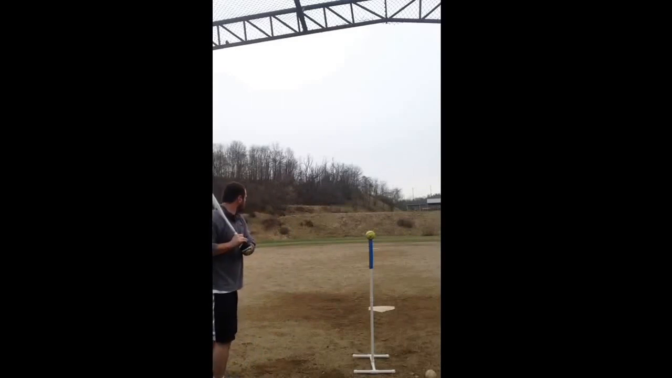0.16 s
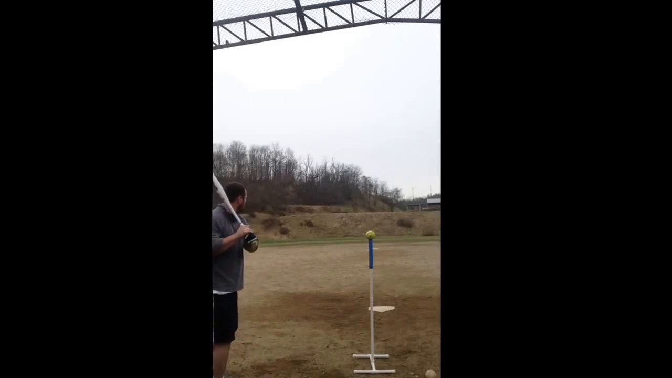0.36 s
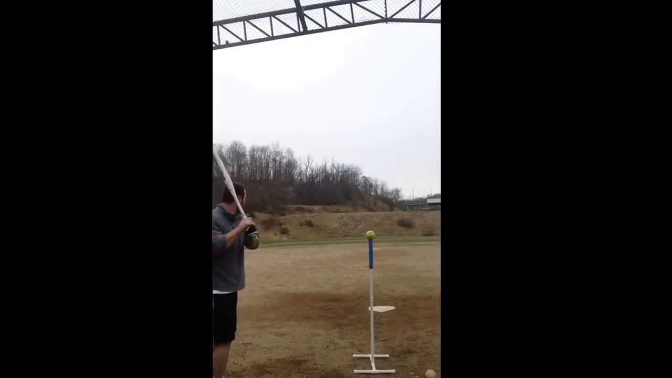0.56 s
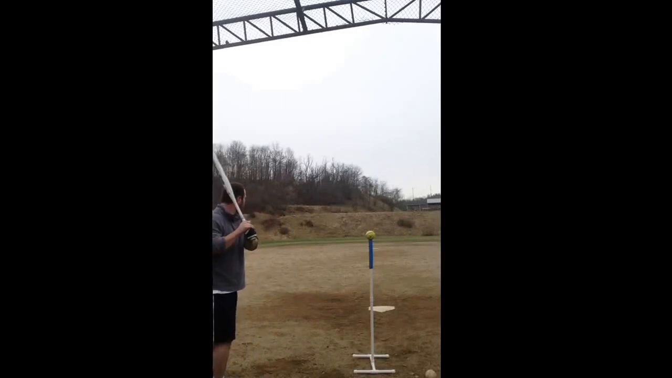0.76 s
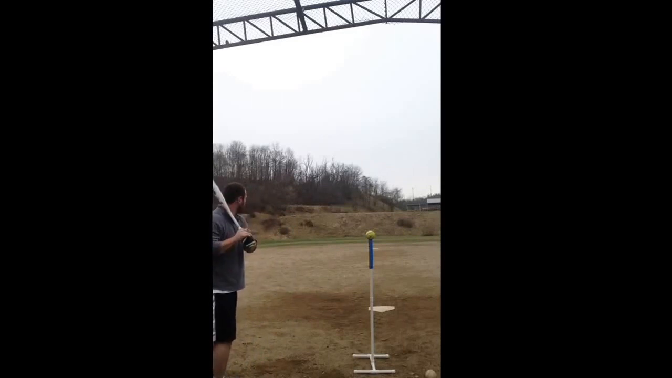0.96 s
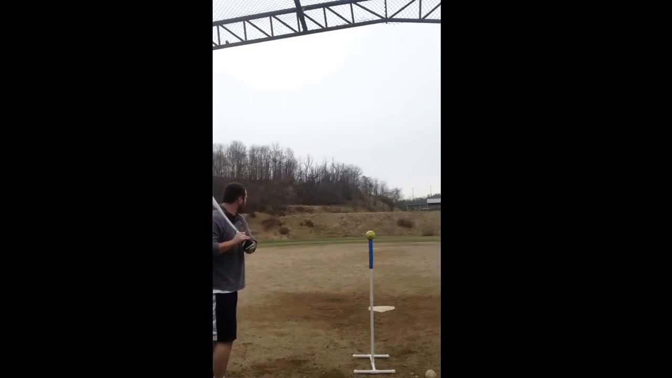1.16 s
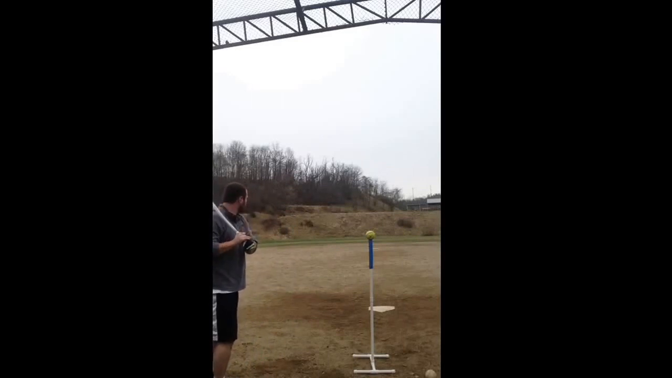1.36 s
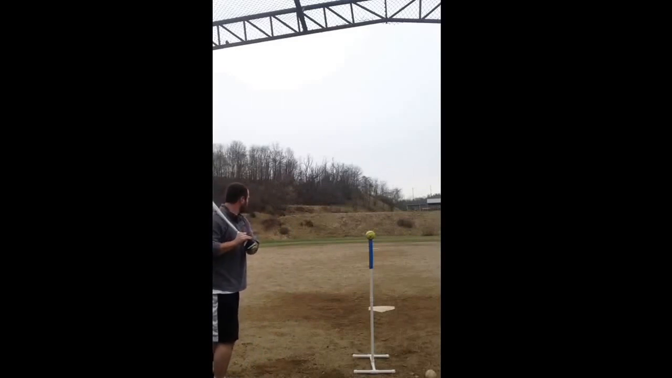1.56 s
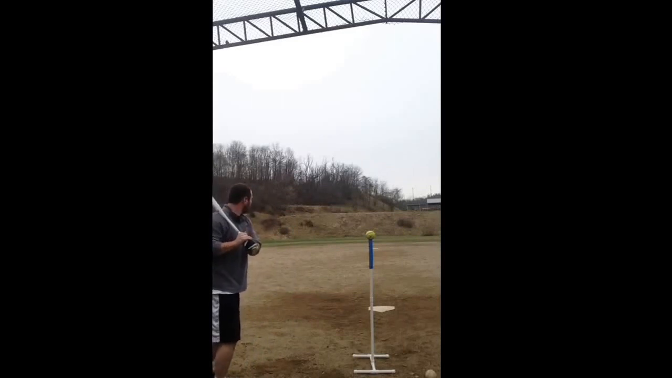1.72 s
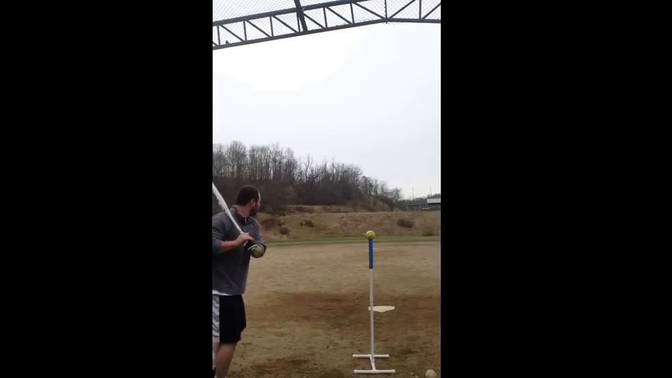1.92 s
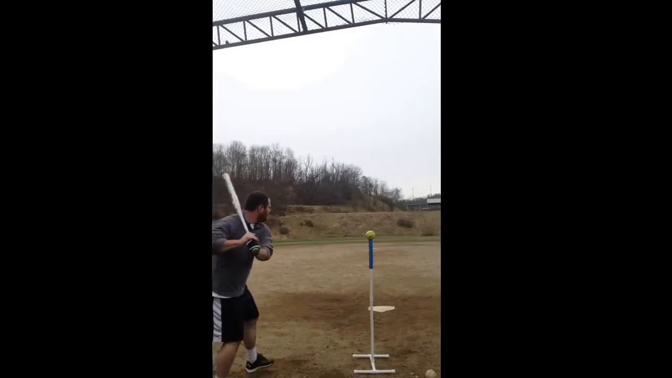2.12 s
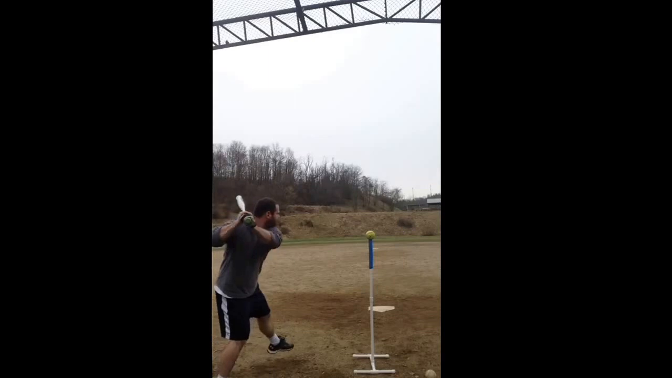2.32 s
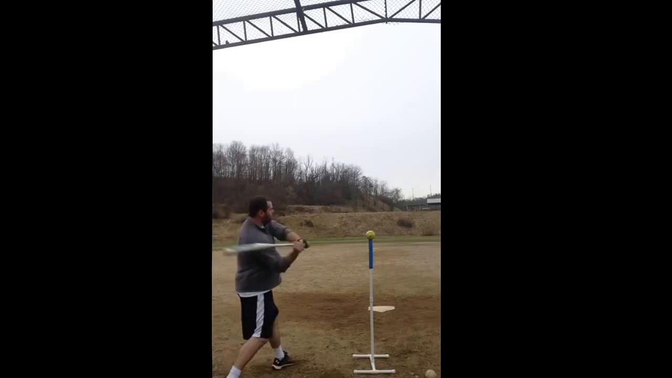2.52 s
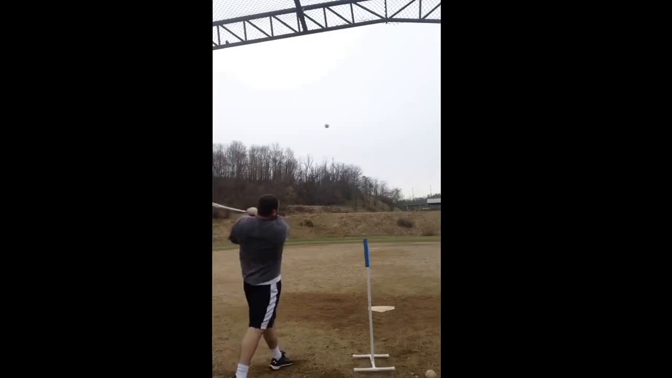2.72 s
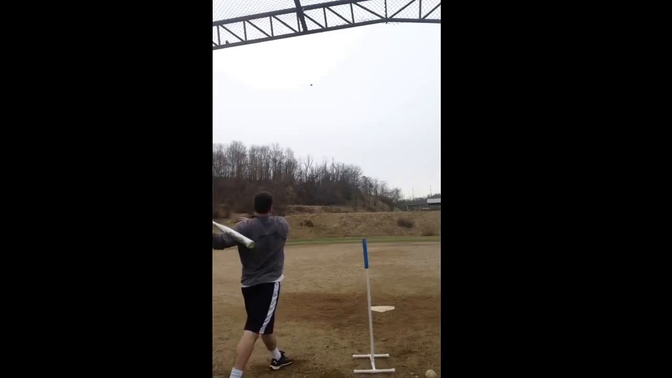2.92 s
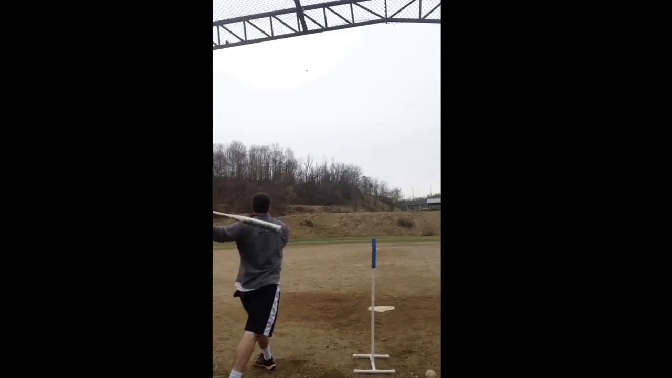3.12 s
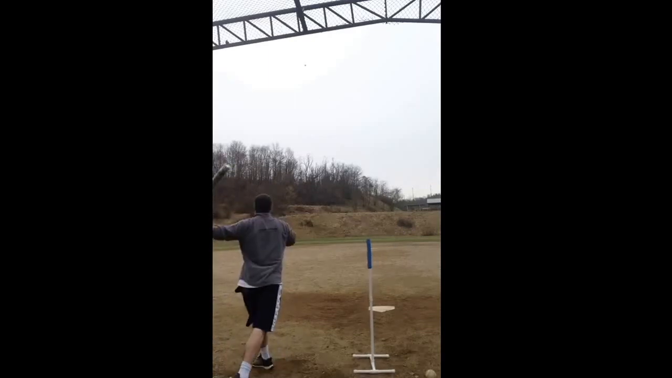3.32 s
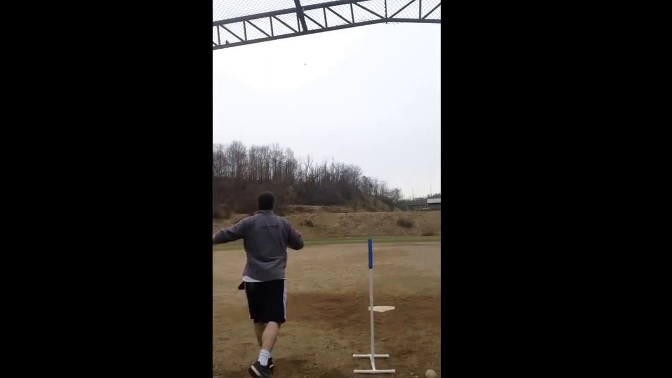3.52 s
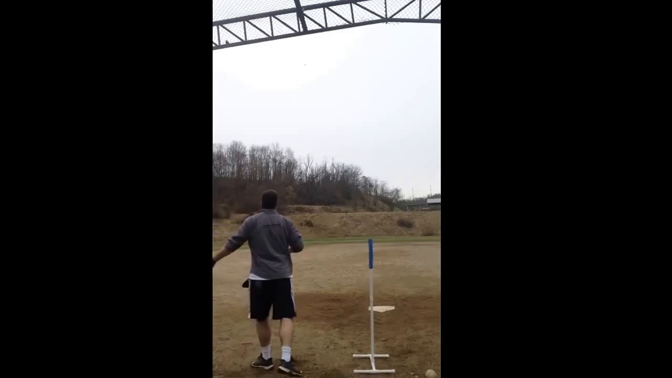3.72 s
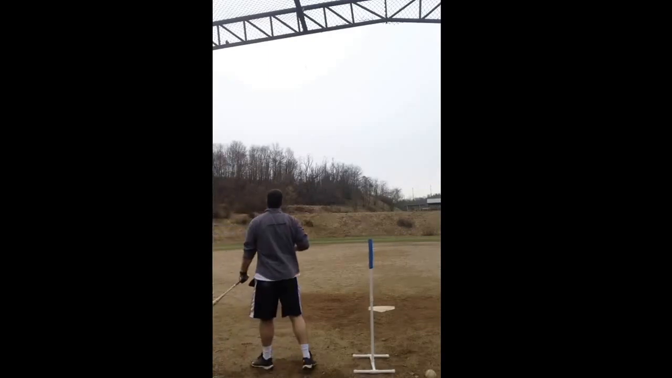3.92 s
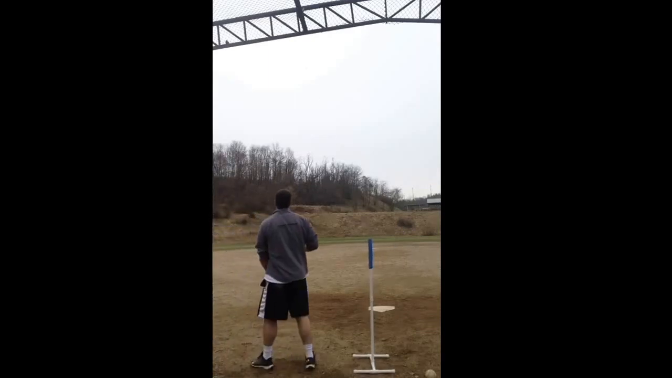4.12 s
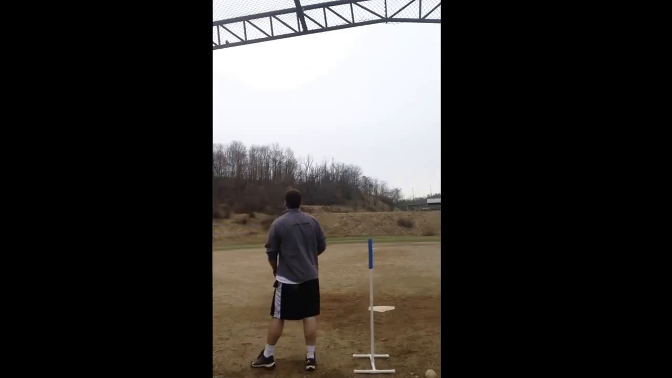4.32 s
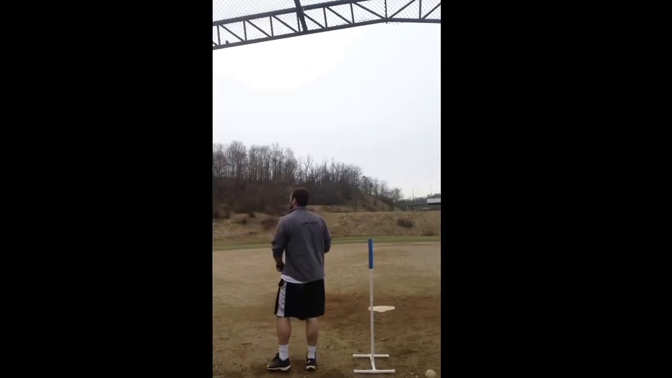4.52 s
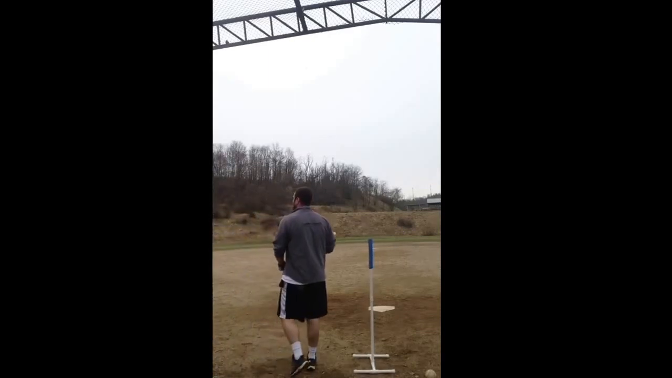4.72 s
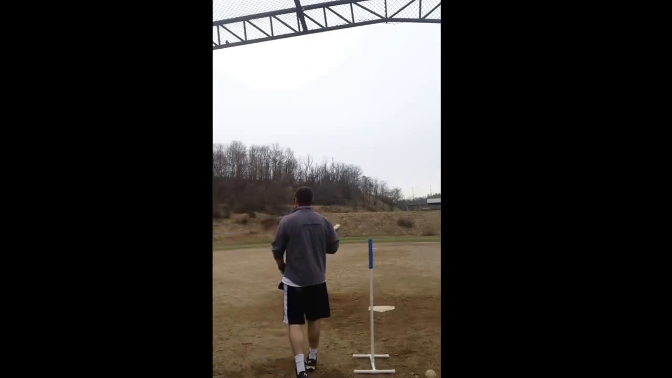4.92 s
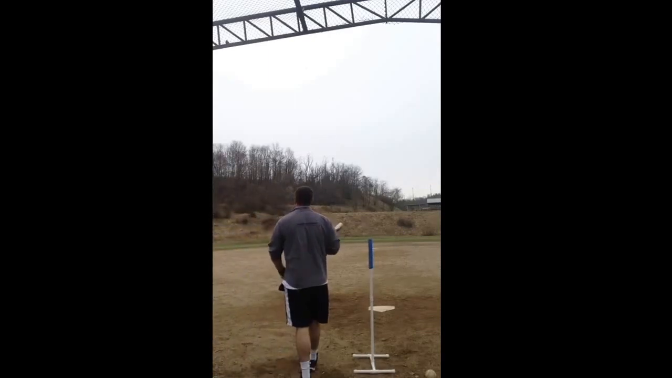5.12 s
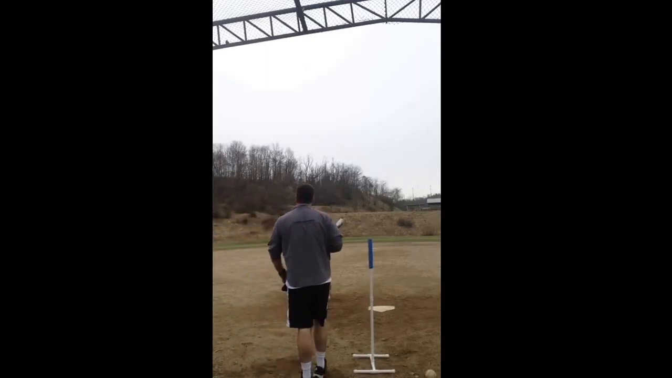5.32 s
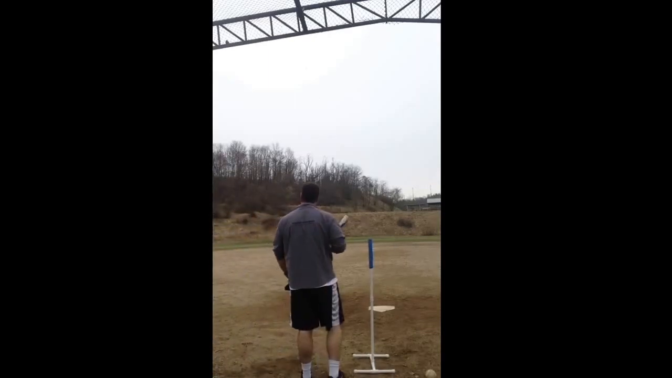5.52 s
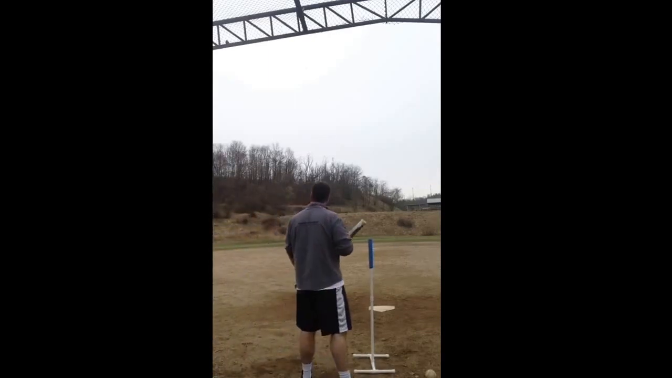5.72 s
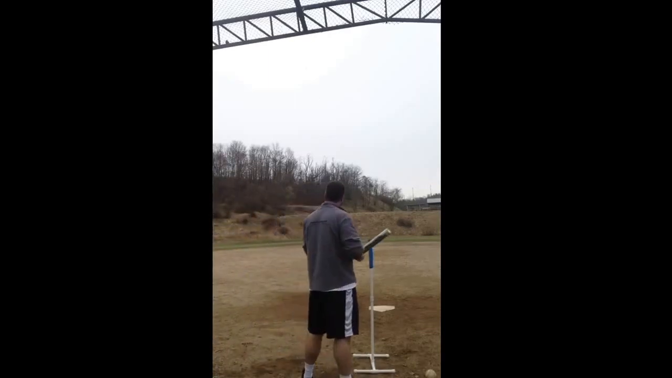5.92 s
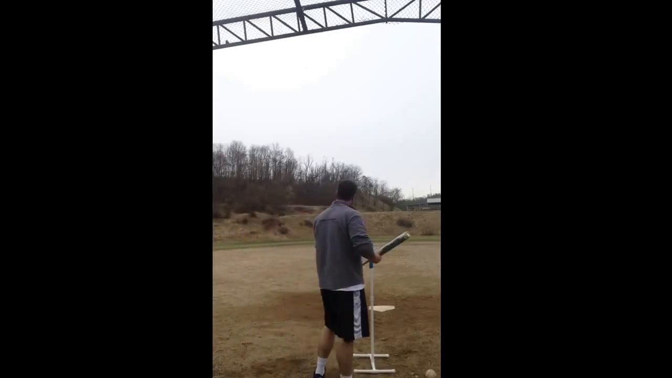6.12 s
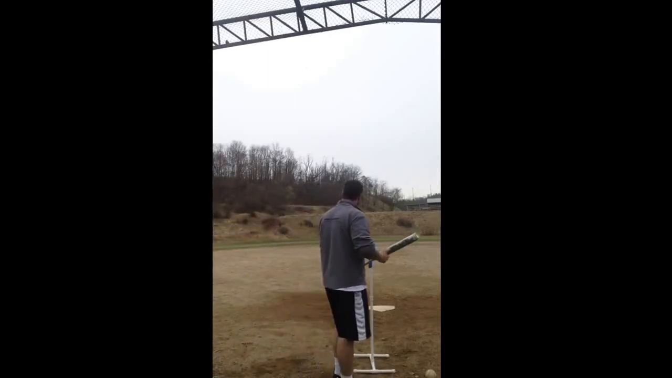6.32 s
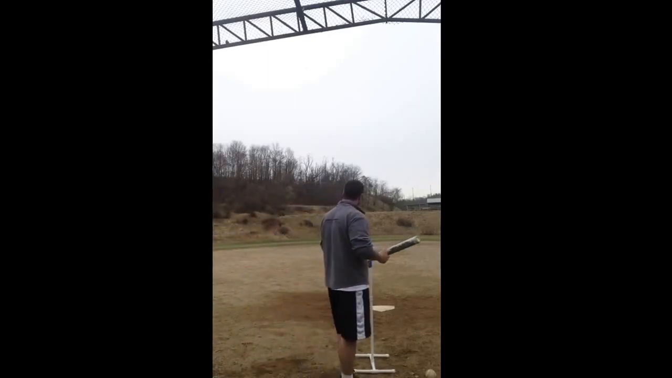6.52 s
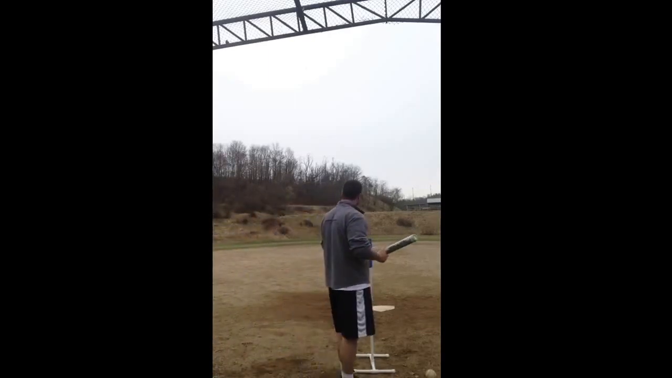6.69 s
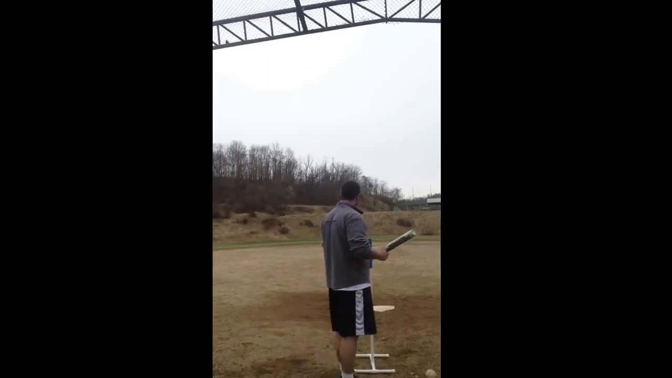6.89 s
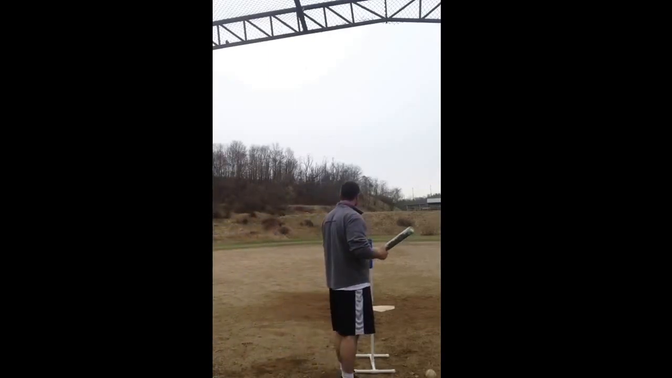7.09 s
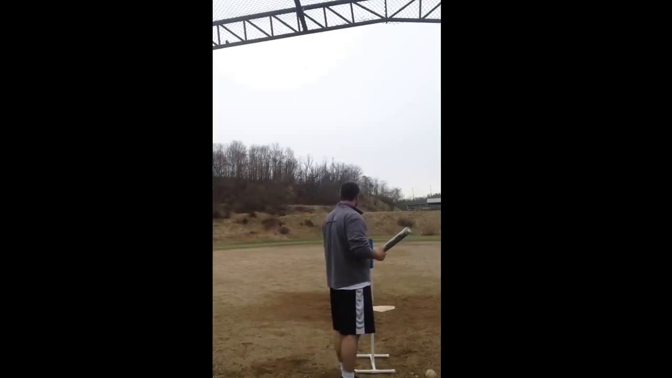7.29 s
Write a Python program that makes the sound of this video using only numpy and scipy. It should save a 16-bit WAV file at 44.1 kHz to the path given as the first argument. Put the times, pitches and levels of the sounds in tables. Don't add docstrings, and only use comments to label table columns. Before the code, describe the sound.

Small birds chirp and whistle far off over soft traffic wash. A batter's step grinds the dirt, heel thumping, then a quick swish ends in a sharp, hard crack that dies almost at once under a shelter frame. Ambience ducks and creeps back; a few steps scuff as a deep, uneven motor hum swells toward the end. Single nearby handheld-style microphone, open air.

```python
import sys
import numpy as np
from scipy import signal
from scipy.fft import rfft, irfft, next_fast_len
from scipy.io import wavfile
from scipy.ndimage import uniform_filter1d, map_coordinates

SR = 44100
rng = np.random.default_rng(int(sys.argv[2]) if len(sys.argv) > 2 else 0)


def transcribe(u):
    v = np.clip(np.atleast_2d(u).T, -1, 1)
    q = np.round(v * 32767).astype(np.int16)
    wavfile.write(sys.argv[1], SR, q)


def to_linear_factor(level_db):
    exponent = np.asarray(level_db, float) / 20
    return 10 ** exponent


N = 324135
STRIKE_S = 2.5668


def unit(x):
    return x / np.sqrt(np.mean(x ** 2) + 1e-20)


def along(points, hz):
    f, v = np.transpose(points)
    return np.interp(np.log(hz + 1), np.log(f + 1), v)


def curves(rows):
    s, *cols = np.transpose(rows)
    return [np.interp(np.arange(N) / SR, s, c) for c in cols]


def wobble(rate):
    knots = rng.standard_normal(int(N * rate / SR) + 4)
    return map_coordinates(knots, [np.arange(N) * rate / SR])


def noise(spectrum, size=N):
    low_end = [(spectrum[0][0] / 1.5, -120)]
    high_end = [(spectrum[-1][0] * 1.5, -120)]
    closed = low_end + list(spectrum) + high_end
    m = next_fast_len(size)
    white = rfft(rng.standard_normal(m))
    return unit(irfft(white * to_linear_factor(along(closed, np.fft.rfftfreq(m, 1 / SR))), m)[:size])


def add(track, s, sound):
    part = track[round(s * SR):][:len(sound)]
    part += sound[:len(part)]


def room(x, decays, wet_db, colour=((20, 0), (20000, 0))):
    hz, t, z = signal.stft(rng.standard_normal(SR // 2), SR, nperseg=128)
    decay_db = along(colour, hz)[:, None] - 60 * t / along(decays, hz)[:, None]
    tail = signal.istft(z * to_linear_factor(decay_db), SR, nperseg=128)[1]
    return to_linear_factor(wet_db) * signal.fftconvolve(x, tail / np.linalg.norm(tail))[:N]


def gain_db():
    duck_db, duck_s, recover_s = -10.5, 0.066, 1
    since = np.maximum(np.arange(N) / SR - STRIKE_S, 0)
    return duck_db * (1 - np.exp(-since / duck_s)) * np.exp(-(since / recover_s) ** 1.4)


# (frequency [Hz], density [dB per Hz])
RUMBLE_COLOUR = [(13, -39), (22, -12), (65, 0), (92, 0), (119, 1.5), (330, -16), (430, -46.5), (730, -120)]
# (frequency [Hz], density [dB per Hz])
ROAD_COLOUR = [(150, -30.5), (250, -5), (383, -4.5), (600, -3), (747, -4), (1400, -16.5), (1950, -45),
               (3300, -120)]
# (frequency [Hz], density [dB per Hz])
FAR_COLOUR = [(900, -9.5), (1400, -1.5), (2200, -4), (3200, -10.5), (4500, -17.5), (7000, -23),
              (9000, -36.5)]
# (multiple of the line [1], level [dB])
SIDE_ORDERS = [(1.549, -15.5), (1.64, -15.5), (1.95, -16.5), (2.901, -23), (3.03, -22.5)]
# (multiple of the line [1], level [dB])
LOPE_ORDERS = [(.625, -9), (.875, -13), (1.125, -17), (1.625, -14), (1.875, -14)]
# (time [s], pitch [Hz], line level [dB])
ENGINE_APPROACH = [(0, 94.02, -54), (.8, 92, -57), (1.4, 90, -62.5), (2.1, 89.04, -64.5),
                   (2.6, 90.52, -57.5), (3.2, 89.5, -51.5), (3.7, 89.31, -48.5), (4.2, 89.19, -45),
                   (4.7, 89.54, -45), (5.5, 89.49, -45), (6.1, 88.2, -44.5), (6.3, 88.57, -41),
                   (6.9, 88.05, -39.5), (7.35, 88.2, -40)]
# (time [s], level [dB])
ROAD_LEVEL = [(0, -60.5), (.6, -61), (1.3, -63), (2.2, -60), (3.2, -60.5), (4.4, -60), (4.8, -60.5),
              (5.6, -58.5), (7.35, -59.5)]


def field():
    t = np.arange(N) / SR
    hz, line_db = curves(ENGINE_APPROACH)
    road_db, = curves(ROAD_LEVEL)
    facing_db = np.interp(t, [4.6, 6.6], [-8, 0])

    clear_s, clearing_s = 3.9, 0.58
    beat_hz, beat_peak_s, beat_depth = 3.65, 3.5, 0.77
    hidden = 1 / (1 + np.exp((t - clear_s) / clearing_s))
    beat = 1 + beat_depth * hidden * np.cos(2 * np.pi * beat_hz * (t - beat_peak_s))

    turn = 2 * np.pi * np.cumsum(hz + .7 * wobble(8)) / SR
    engine = np.sin(turn) * to_linear_factor(3.5 + 0.7 * wobble(4.4))
    for multiple, db in SIDE_ORDERS:
        engine += np.sin(multiple * turn + 0.68 * wobble(4.2)) * to_linear_factor(db + 1.8 * wobble(7))
    for multiple, db in LOPE_ORDERS:
        level_db = db + 3 + facing_db + 1.5 * wobble(5)
        engine += np.sin(multiple * turn + .4 * wobble(3)) * to_linear_factor(level_db)

    road_rumble = to_linear_factor(road_db + 3.5)
    exhaust_roar = to_linear_factor(line_db + facing_db - 10.5)
    both = np.hypot(road_rumble, exhaust_roar)
    rumble = both * to_linear_factor(3.5 + 1.2 * wobble(3.7)) * noise(RUMBLE_COLOUR)
    throb = to_linear_factor(road_db - 2) * noise([(49, -12.0), (55, -1.0), (61, -13.0)])
    road = to_linear_factor(road_db + 0.5 + 0.93 * wobble(7.6)) * noise(ROAD_COLOUR)
    far = to_linear_factor(road_db + 0.24 * facing_db - 7 + 0.55 * wobble(2.7)) * noise(FAR_COLOUR)
    return to_linear_factor(gain_db()) * (to_linear_factor(line_db) * beat * engine + rumble + throb + road + far)


def whistle(hz, scratch):
    jitter = np.repeat(rng.standard_normal(len(hz) // 40 + 1), 40)[:len(hz)]
    return np.sin(2 * np.pi * np.cumsum(hz * (1 + scratch * jitter)) / SR)


# (share of length [1], pitch [Hz], level [dB])
DROP_SHAPE = [(0, 3150, -20), (.3, 3340, -15), (.45, 3330, -16), (.58, 3200, -4), (.76, 2990, 0),
              (.84, 2720, -16), (1, 2350, -14)]
ARCH_SHAPE = [(0, 2200, -20), (.25, 2520, -10), (.38, 2760, -13), (.48, 2900, -3), (.6, 2950, 0),
              (.72, 2960, -1), (.8, 2800, -20), (1, 2420, -40)]
SLUR_SHAPE = [(0, 3400, -9), (.1, 2980, 0), (.2, 2700, -12), (.33, 2490, -3), (.7, 2300, -10),
              (1, 2220, -15)]
SWOOP_SHAPE = [(0, 3480, -22), (.03, 3380, -7), (.1, 3020, 3), (.16, 2760, -12), (.22, 2600, -7),
               (.33, 2450, -2), (.62, 2300, -10), (.74, 2360, -15), (.87, 2520, -9), (1, 2720, -16)]
FLICK_SHAPE = [(0, 3300, -14), (.4, 3210, -7), (.7, 3020, 0), (1, 2760, -8)]
# (time [s], length [s], pitch factor [1], level [dB])
DROPS_SUNG = [
    (.913, .058, 1.01, -57),
    (4.038, .054, 1, -56),
]
ARCHES_SUNG = [
    (.988, .053, .995, -53),
    (4.1, .064, 1.02, -53),
]
SLURS_SUNG = [
    (1.035, .058, 1.01, -59),
    (4.152, .068, .99, -60),
]
SWOOPS_SUNG = [
    (1.487, .158, 1, -51),
    (4.645, .162, .985, -58),
]
FLICKS_SUNG = [
    (1.455, .031, 1, -57),
    (4.617, .03, .99, -64),
]
# (time [s], pitch [Hz], level [dB])
CHIP_CALLS = [(.228, 4840, -80.5), (.284, 4260, -76), (.397, 4300, -71), (.5, 4200, -66), (.614, 4150, -72),
              (0.731, 4250, -63), (0.817, 4200, -65), (.269, 3200, -70), (.732, 5300, -76),
              (.284, 3950, -74), (1.63, 4200, -80), (1.742, 4120, -71), (5.535, 4500, -78)]
# (time [s], length [s], start pitch [Hz], end pitch [Hz], level [dB])
GLIDE_CALLS = [(.243, 0.03, 3950, 3650, -74), (.328, 0.16, 1790, 2100, -81.5), (.482, .02, 3600, 3150, -75),
               (.708, 0.02, 3800, 3320, -72), (1.357, .013, 3800, 5700, -71), (.595, .018, 3750, 3280, -77),
               (.775, 0.026, 6260, 6900, -79), (1.09, 0.11, 2180, 2040, -76),
               (1.683, .035, 3000, 3260, -68), (4.375, .06, 2740, 2800, -75), (.3, .07, 3700, 4050, -84),
               (.575, .025, 3500, 3850, -81), (.252, .03, 2950, 3050, -74), (1.952, 0.015, 2800, 2330, -65),
               (1.986, 0.077, 4660, 4474, -70.5), (2.035, .014, 3100, 3400, -63),
               (2.046, .025, 3380, 3540, -69), (2.274, .024, 7300, 4393, -72),
               (4.42, .17, 2830, 3030, -78.5), (5.995, .018, 3800, 3400, -77),
               (6.265, .025, 2450, 2800, -73.5), (6.36, 0.031, 2800, 3050, -73),
               (5.128, 0.032, 7300, 7800, -75), (5.16, .033, 2880, 3200, -78.5),
               (5.408, 0.048, 3226, 3700, -77), (5.972, .028, 3916, 3846, -77),
               (6.1, .019, 3683, 3400, -76.5), (6.288, 0.045, 2870, 3100, -64.5),
               (6.396, 0.05, 2890, 3083, -65.5), (6.8, 0.04, 3600, 3350, -78),
               (6.879, 0.014, 2720, 2320, -67)]
# (time [s], length [s], pitch [Hz], level [dB])
HELD_CALLS = [(.553, .015, 3270, -74), (.87, 0.03, 3330, -81), (0.212, .03, 2980, -76),
              (1.715, 0.052, 3220, -74), (1.805, .025, 3120, -76), (1.922, .028, 3540, -77.5),
              (1.958, 0.0208, 3570, -75), (1.969, 0.043, 2790, -64), (1.97, 0.18, 2189, -75.5),
              (2.027, .055, 2760, -72), (2.092, .016, 2740, -73), (2.115, .028, 2770, -71),
              (2.148, .015, 2780, -71), (2.215, .045, 2770, -75), (2.11, .035, 3380, -77),
              (2.167, .02, 3360, -73), (2.008, .025, 3700, -80), (2.108, .025, 2180, -72),
              (1.937, .018, 2760, -75), (3.395, 0.083, 2350, -71), (5.17, 0.0575, 7150, -80.5),
              (5.21, 0.028, 2720, -66), (5.24, .06, 2720, -76), (5.33, .05, 2310, -75),
              (5.288, .042, 2314, -63.5), (5.447, .07, 3690, -75), (5.598, 0.04, 2727, -73.5),
              (5.655, .09, 2780, -78), (5.762, .022, 2780, -74), (5.93, .03, 3350, -77),
              (6.61, .02, 3650, -73), (6.563, .03, 3050, -77), (1.027, 0.015, 2490, -63),
              (1.012, .045, 4400, -79), (1.265, .025, 3220, -75), (1.655, .035, 2500, -73),
              (1.76, .018, 3120, -74), (4.188, .016, 2950, -72), (4.219, .035, 2850, -74.5),
              (5.793, .063, 3340, -68.5), (5.833, .085, 2790, -75), (5.852, 0.04, 3750, -75),
              (5.864, 0.0348, 3348, -72), (6.188, 0.1, 3734, -74.5), (6.354, 0.0482, 3230, -74),
              (6.47, 0.043, 3060, -72), (6.832, 0.053, 2710, -65), (6.818, .014, 2540, -71),
              (6.889, 0.047, 2300, -68), (6.94, .045, 2300, -75), (6.91, .025, 2724, -70),
              (6.945, .02, 3400, -75), (7.3, 0.046, 7370, -80.5)]


def birds():
    song = np.zeros(N)
    syllables = [(DROP_SHAPE, DROPS_SUNG), (ARCH_SHAPE, ARCHES_SUNG), (SLUR_SHAPE, SLURS_SUNG),
                 (SWOOP_SHAPE, SWOOPS_SUNG), (FLICK_SHAPE, FLICKS_SUNG)]
    for shape, sung in syllables:
        share, hz, swell_db = np.transpose(shape)
        for s, length, factor, db in sung:
            u = np.linspace(0, 1, round(length * SR))
            track = uniform_filter1d(factor * np.interp(u, share, hz), size=90, mode="nearest")
            swell = to_linear_factor(db + 5.0 + np.interp(u, share, swell_db)) * np.sin(np.pi * u) ** 0.055
            add(song, s, swell * whistle(track, 0.0066))

    chance = rng.random((130, 5))
    far_s = chance[:, 0] * N / SR
    far_length = .012 + .05 * chance[:, 1]
    far_hz = 2100 + 1900 * chance[:, 2]
    bend = 1 + 0.18 * (chance[:, 3] - .5)
    far_db = -94 + 7 * chance[:, 4]
    chorus = np.c_[far_s, far_length, far_hz / bend, far_hz * bend, far_db]

    held = [(s, length, hz, hz, db) for s, length, hz, db in HELD_CALLS]
    chip_s, chip_rise = .013, .12
    chips = [(s, chip_s, hz * (1 - chip_rise / 2), hz * (1 + chip_rise / 2), db) for s, hz, db in CHIP_CALLS]
    for notes, scratch in [([*GLIDE_CALLS, *held, *chorus], .007), (chips, .05)]:
        for s, length, start_hz, end_hz, db in notes:
            u = np.linspace(0, 1, round(length * SR))
            track = start_hz + (end_hz - start_hz) * u ** .7
            swell = to_linear_factor(db + 4.5) * np.abs(np.sin(np.pi * u)) ** 0.43
            add(song, s, swell * whistle(track, scratch))

    song *= to_linear_factor(1.8 * wobble(110))
    echo_flutter = 240
    return song + room(song * wobble(echo_flutter), [(1000, 0.75), (8000, 0.45)], wet_db=-11.5)


# (time [s], length [s],
# level [dB], lowest frequency [Hz], tilt [dB per octave])
SCUFF_STROKES = [(0.911, 0.25, -69.5, 2840, -57), (1.518, .036, -78, 3930, 3), (1.848, .08, -76, 3495, 0),
                 (2.275, 0.2, -65, 3020, -4), (2.3, .006, -74, 5000, -6), (2.312, .006, -72, 4000, -3),
                 (2.375, .055, -54, 3500, -4), (2.371, .006, -55, 8000, -3), (.95, .8, -72, 1100, -20),
                 (2.42, .05, -66, 3000, -4), (2.4, 0.079, -64, 1500, 1), (2.352, .005, -58, 4500, -8),
                 (2.475, .009, -53, 1800, -13), (2.74, 0.037, -63.5, 2930, -4.5),
                 (2.88, 0.13, -65.5, 3000, -6), (2.929, .075, -61, 2400, -11),
                 (2.988, 0.0077, -62.5, 2000, -8), (3.275, .008, -62, 2200, -8),
                 (3.256, .012, -66.5, 2500, -5), (3.0, 0.2, -68, 2500, -5.5),
                 (3.116, 0.029, -66, 2470, -10), (3.239, 0.072, -69.5, 2540, -11),
                 (3.373, 0.15, -61, 1320, -16), (3.954, 0.031, -50.5, 1507, -8.5),
                 (4.205, 0.076, -73.5, 3510, -7), (4.264, 0.036, -74.5, 3520, -10),
                 (4.567, 0.03, -78.5, 4004, -7.5), (4.84, 0.3, -72, 2520, -8),
                 (6.295, 0.13, -70, 2200, -15), (7.05, 0.042, -79, 4000, 2)]
# (time [s], length [s], level [dB], lowest
# frequency [Hz], tilt [dB per octave])
STAMP_STROKES = [(2.369, .078, -42.5, 1400, -8), (2.371, .018, -46, 2300, -12),
                 (3.951, .03, -53.5, 1570, -6), (2.37, .055, -49.5, 346, -8), (2.63, 0.78, -71, 2200, -6),
                 (3.211, 0.067, -70, 1981, -8), (4.228, 0.0076, -66, 2800, -10),
                 (2.6, .13, -55.5, 900, -6.5), (4.777, 0.21, -66.5, 2900, -5.5),
                 (5.709, 0.13, -70, 3200, -3), (5.152, .93, -84, 4800, -19.5)]
# (time [s], pitch [Hz], peak level [dB], decay time T60 [s])
HEEL_THUDS = [
    (2.367, 192, -44, 0.101),
    (2.517, 117, -26.5, 0.12),
    (3.378, 289, -37.5, 0.11),
]
# (frequency [Hz], decay time T60 [s])
FRAME_DECAY = [(200, 0.24), (800, 0.14), (2000, 0.16), (4000, 0.19), (8000, 0.21), (15000, 0.2)]


def feet():
    track = np.zeros(N)
    strokes = [(.33, 1.4, *row) for row in SCUFF_STROKES] + [(.05, 2.2, *row) for row in STAMP_STROKES]
    for rise, fade, s, length, db, low_hz, tilt_db in strokes:
        t = np.arange(round(length * SR)) / SR
        ramp = np.interp(t, [0, rise * length, length], [0, 1, 0])
        stroke = np.sin(np.pi / 2 * ramp) ** fade
        treble_db = tilt_db * np.log2(8000 / low_hz / 1.9)
        colour = [(low_hz / 4, -22), (low_hz / 2, -12), (low_hz, -3), (low_hz * 1.5, 0), (8000, treble_db)]
        colour += [(15300, treble_db + tilt_db - 5.5)]
        grains = np.repeat(rng.standard_normal(len(t) // 30 + 1), 30)[:len(t)]
        grit = to_linear_factor(3.2 * grains)
        add(track, s, to_linear_factor(db) * stroke * unit(grit * noise(colour, size=len(t))))
    track += room(track, FRAME_DECAY, wet_db=-12)

    t = np.arange(SR // 8) / SR
    sag_per_s = 5.2
    for s, hz, db, t60 in HEEL_THUDS:
        envelope = to_linear_factor(db - 60 * t / t60) * (1 - np.exp(-t / 0.0046))
        add(track, s, envelope * np.sin(2 * np.pi * hz * t * (1 - sag_per_s * t / 2)))
    return track


# (time [s], push level [dB], whoosh level [dB], fizz level [dB])
SWING_LEVELS = [
    (2.44, -86, -78, -60),
    (2.496, -45.5, -62.5, -63.5),
    (2.528, -40, -49, -52.5),
    (2.55, -36, -44, -46.5),
    (2.559, -36.5, -32, -35.5),
]


def swing():
    push_db, whoosh_db, fizz_db = curves(SWING_LEVELS)
    t = np.arange(N) / SR
    start_s = SWING_LEVELS[0][0]
    gate = np.interp(t, [start_s, start_s + 0.033, STRIKE_S, STRIKE_S + 0.015], [0, 1, 1, 0])
    air = to_linear_factor(push_db) * noise([(60, -9), (110, 4.5), (180, -12), (330, -8)])
    air += to_linear_factor(whoosh_db) * noise([(300, -2.5), (700, 4.5), (1200, -4.5), (1800, -6.5)])
    air += to_linear_factor(fizz_db) * noise([(1800, 4.5), (3000, 3), (7000, -3.5), (15000, -10)])

    shriek_db = np.interp(t, STRIKE_S + np.array([-.012, -.008, -.002, 0.013]), [-48, -29, -24, -41])
    shriek = to_linear_factor(shriek_db) * (abs(t - STRIKE_S + .006) < .0063)
    tone = np.sin(2 * np.pi * 5330 * t + 1.3 * wobble(600))
    return gate * air + shriek * tone * to_linear_factor(2.5 * wobble(500))


# (frequency [Hz], peak level [dB], decay
# time T60 [s])
PUSHING_MODES = [(328, -21.5, .06), (578, -30, .026), (685, -7.5, .022), (2385, -14, .028),
                 (2840, -27, .03), (3530, -25, 0.055), (4480, -25, .025), (9560, -21, 0.014),
                (6760, -26, 0.025), (12600, -17, 0.008)]
# (frequency [Hz], peak level [dB], decay time T60 [s])
PULLING_MODES = [(890, -16, .034), (1147, -4.5, .024), (1700, -21, .02), (1858, -19, .024),
                 (2023, -5, .006)]
# (delay [s], level [dB])
WALL_ECHOES = [(.0075, -21.5), (.0135, -26), (.0195, -19), (.026, -26), (.039, -30), (.052, -34),
               (.078, -35), (.064, -38), (.097, -44), (.125, -49)]
# (frequency [Hz], density [dB per Hz])
ANSWER_COLOUR = [(200, -8.5), (400, 1.5), (1000, 1), (2500, -3), (4000, -7.5), (6000, -13), (15000, -13.5)]


def crack():
    t = np.arange(SR // 8) / SR
    ring = np.zeros(len(t))
    modes = [(1, mode) for mode in PUSHING_MODES] + [(-1, mode) for mode in PULLING_MODES]
    for way, (hz, db, t60) in modes:
        swell = 1 - np.exp(-t * hz / 0.25)
        ring += way * to_linear_factor(db - 60 * t / t60) * swell * np.sin(2 * np.pi * hz * t)
    snap_colour = [(1500, -4.5), (2500, 1.5), (6000, -4.0), (15000, -7.0)]
    snap = to_linear_factor(-21.5 - 60 * t / 0.032) * noise(snap_colour, size=len(t))
    track = np.zeros(N)
    add(track, STRIKE_S + .00012, ring + snap)

    ping = to_linear_factor(-5 - 60 * t / .004) * np.sin(2 * np.pi * 5200 * t) * (1 - np.exp(-t / .0002))
    add(track, STRIKE_S - .0002, ping)

    dull = uniform_filter1d(ring + snap, size=14) * to_linear_factor(-60 * t / 0.03)
    for delay, db in WALL_ECHOES:
        add(track, STRIKE_S + delay, to_linear_factor(db) * dull)

    slap = to_linear_factor(-14) * noise([(4000, -3), (8000, -3), (12500, 1), (14500, -9)], size=22)
    add(track, STRIKE_S - .0001, slap)

    contact = np.zeros(N)
    contact[round((STRIKE_S + .003) * SR)] = 1
    return track + room(contact, FRAME_DECAY, wet_db=-0.5, colour=ANSWER_COLOUR)


def scene():
    return (field() + birds() + feet() + swing() + crack())[None]


# (frequency [Hz], density [dB per Hz])
HISS_COLOUR = [(1500, -5), (3500, -1), (5500, -5.5), (7500, -1), (10000, -3.5), (13000, -1.5),
               (15300, -4.5)]


def microphone_hiss():
    return to_linear_factor(-78.5 + .25 * gain_db()) * noise(HISS_COLOUR)


def band_limit(x):
    return signal.sosfilt(signal.butter(12, 15450, fs=SR, output="sos"), x)


def record(dry):
    hz = np.fft.rfftfreq(N, 1 / SR)
    band = hz ** 3 / (hz ** 3 + 42 ** 3)
    band *= np.interp(hz, [14000, 15250, 15400], [1, .6, 0])
    rounded = dry / (1 + np.abs(dry / .95) ** 4) ** (1 / 4)
    mix = irfft(rfft(rounded + microphone_hiss()) * band, N)
    return band_limit(mix)


dry = scene()
out = record(dry)
transcribe(out)
```